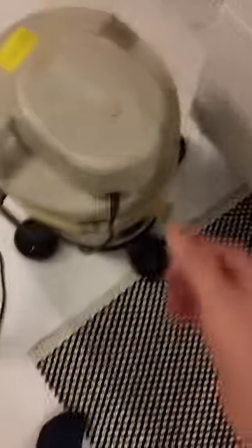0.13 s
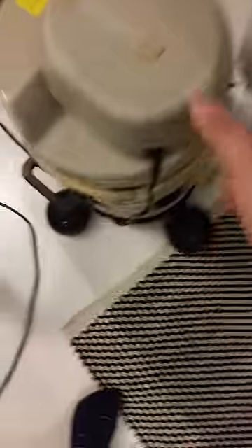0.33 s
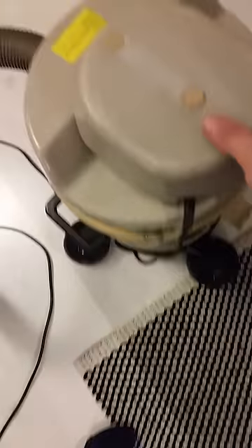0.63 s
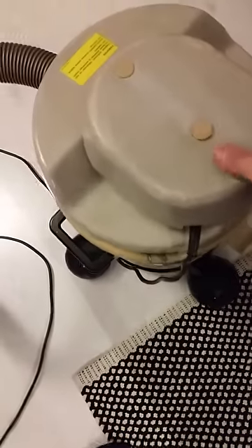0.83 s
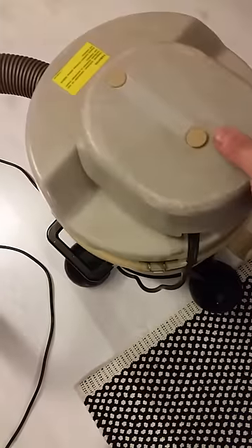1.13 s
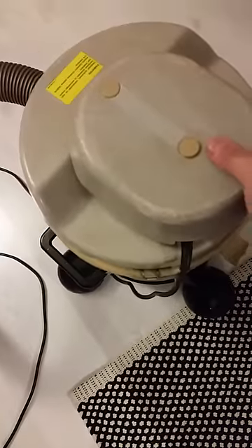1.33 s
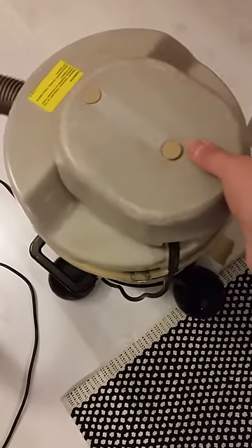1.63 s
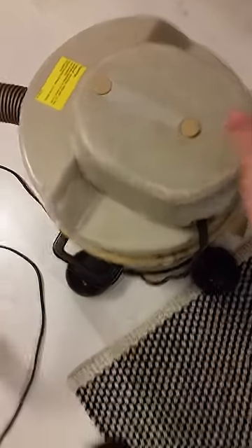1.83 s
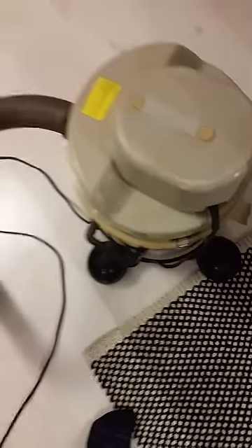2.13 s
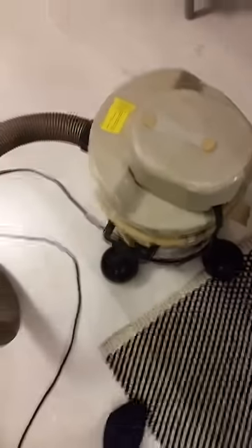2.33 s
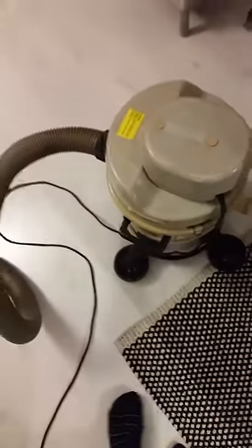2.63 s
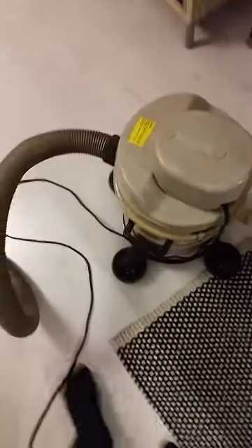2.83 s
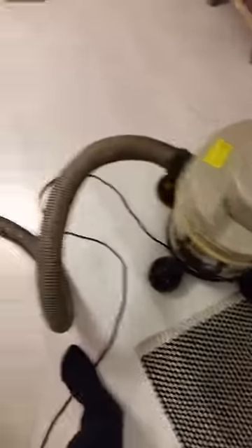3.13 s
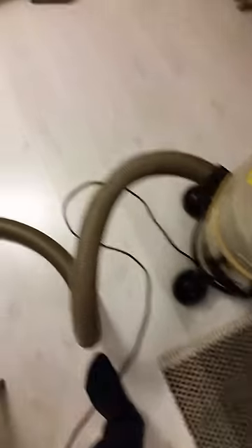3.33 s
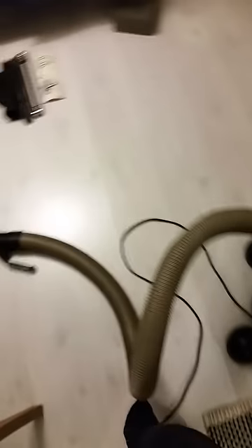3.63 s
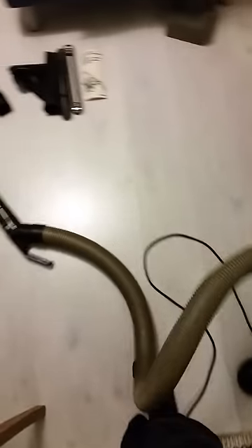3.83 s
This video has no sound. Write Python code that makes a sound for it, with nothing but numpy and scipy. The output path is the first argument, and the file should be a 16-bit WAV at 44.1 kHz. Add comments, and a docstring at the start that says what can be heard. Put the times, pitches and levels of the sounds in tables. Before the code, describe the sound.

A vacuum cleaner motor snaps on in a quiet room and spins up to a loud roar

```python
"""A wet and dry vacuum cleaner starts in a quiet room: filtered-noise room tone, a faint rustle, soft bumps.
At 1.7 s the switch snaps (decaying sines and noise); inrush makes the motor hum and its brushes fizz.
The shaft spins up to a steady tone with blade whine and overtones (sines locked to one shaft angle).
Air roars through the fan (noise that grows with speed) and booms in the drum (a wandering sine),
while the microphones back away towards the hose (level curves)."""
import sys
import numpy as np
from scipy import signal
from scipy.fft import rfft, irfft
from scipy.io import wavfile
from scipy.ndimage import uniform_filter1d

SR = 44100
rng = np.random.default_rng(int(sys.argv[2]) if len(sys.argv) > 2 else 0)


def inscribe(sig):
    """Save sig as 16-bit PCM at rate SR to the path in sys.argv[1].

    A 1-D sig is mono; a 2-D sig holds one channel per row.
    Samples are clipped to [-1, 1] before scaling.
    """
    pcm = np.round(np.clip(np.atleast_2d(sig).T, -1, 1) * 32767)
    wavfile.write(sys.argv[1], SR, pcm.astype(np.int16))


N = 176400
T = np.arange(N) / SR
HZ = np.fft.rfftfreq(N, 1 / SR)

# Spectra give relative density; each noise is scaled to rms 1 before its level.
# stereo balance: (frequency [Hz], left minus right [dB])
TILT = [(100, -2.5), (330, 0), (500, 4), (1000, 1.5), (1600, 2), (2400, -4), (3300, 0), (4000, 1),
        (5000, -9), (5600, -4), (6700, -1.5), (7700, 13), (9600, 24), (11500, 18), (13500, 13), (15500, 10)]
ROOM_TILT = [(40, -5), (120, -19), (200, -10), (300, -1), (550, 8), (1700, 6), (2700, -4), (3900, 12.5),
             (5500, 0), (10000, 2), (11500, 5), (15500, 5)]
# left-right likeness of noise: (frequency [Hz], correlation [-1..1])
LIKENESS = [(30, 0.21), (100, 1), (350, 0.63), (600, 0.69), (1000, 0.47), (1500, .05), (2200, 0.03),
            (4000, -0.15), (7000, -0.02), (16000, 0)]

# quiet room spectrum: (frequency [Hz], density [dB per Hz])
ROOM_SPECTRUM = [(25, -3.5), (55, -1), (100, -2.5), (150, -6.5), (250, -20.5), (450, -25.5), (580, -22.5),
                 (1000, -28.5), (1800, -34), (2300, -44), (2900, -54), (3300, -41), (3700, -27),
                 (4100, -28.5), (4600, -41), (6200, -61), (10300, -59), (11600, -51), (12700, -51),
                 (15500, -45)]
ROOM_DB = -53.5
# handling rustle spectrum: (frequency [Hz], density [dB per Hz])
RUSTLE_SPECTRUM = [(80, 5.5), (200, 5), (500, -2.5), (900, -8), (1400, -14), (1750, -4), (2200, -24),
                   (3000, -24), (3900, -8.5), (4800, -30), (15000, -47)]
# handling rustle level: (time [s], level [dB])
RUSTLE_LEVEL = [(0, -58.5), (.17, -58.5), (.42, -59.5), (.6, -71), (1.0, -90)]
# soft handling bumps: (centre time [s], peak level [dB], frequency [Hz], 1/e half-length [s])
BUMPS = [(.13, -52, 110, .015), (.185, -50, 130, .015), (.853, -66, 800, .01), (.91, -63, 430, .025),
         (1.485, -45, 100, .013)]

# switch snaps: (time [s], level [dB])
SNAPS = [(1.6918, -43), (1.6941, -28.5)]
# plastic lid modes: (frequency [Hz], level re snap [dB], t60 [s])
LID_MODES = [(384, -10, 0.22), (557, 2, .055), (800, -8, 0.036), (1170, -10, .05), (1600, -0.5, 0.027),
             (2130, -10, 0.047), (3660, -21, .03), (4500, -10.5, 0.016)]
# switch crack spectrum: (frequency [Hz], density [dB per Hz])
CRACK_SPECTRUM = [(300, 8), (2000, 6), (3000, -13), (5000, -3), (7000, -27), (9500, -20), (12000, -5),
                  (15500, -9)]
CRACK_RE_SNAP_DB, CRACK_T60_S = 3, 0.028

HUM_HZ, HUM_RISE_S = 100, 0.023
INRUSH_HUM_DB, STEADY_HUM_DB = -30, -49
INRUSH_HOLD_S, INRUSH_FADE_S = 0.15, 0.26
# brush fizz spectrum: (frequency [Hz], density [dB per Hz])
BRUSH_SPECTRUM = [(100, -2), (400, -1), (900, 0.5), (1300, -8), (2100, -9), (3000, -15), (5000, -25),
                  (7000, -34), (8500, -22), (11000, -25), (15000, -24)]
BRUSH_DB, BRUSH_PULSE_DEPTH = -38, 0.21
# brush sparks as the rotor breaks loose: (time [s], level before the hum rise [dB], 1/e half-length [s])
SPARKS = [(1.709, -37, .004), (1.732, -36.5, 0.0098)]

ON_S, TOP_HZ = 1.7, 333.5
QUICK_S, SLOW_S, SLOW_SHARE = 0.12, 0.28, 0.47
# shaft tone at the moving microphones: (time [s], left level [dB], right level [dB])
SHAFT_LEVEL = [(1.7, -60, -60), (1.77, -38, -44), (1.805, -24.5, -26), (1.86, -20.5, -24.5),
               (1.93, -33, -25), (2.035, -46, -32), (2.08, -25.5, -23), (2.19, -27, -21.5),
               (2.27, -25.5, -20.5), (2.35, -21.5, -18.5), (2.46, -18.5, -15.5), (2.575, -41, -25),
               (2.64, -24.5, -27.5), (2.75, -20.5, -21.5), (3.0, -18, -18), (3.5, -13.5, -12.5),
               (3.75, -15.5, -14), (4.0, -18, -15)]
SHAFT_LAG_RAD = 0.15  # mean lag between the microphones
WOBBLE_SHARE = 0.00046  # rms, of shaft speed
BLADES = 6
# blade whine: (time [s], level [dB])
WHINE_LEVEL = [(1.7, -70), (1.9, -32.5), (2.05, -42), (2.1, -33), (2.2, -35), (2.3, -36), (2.85, -46),
               (3.1, -33), (3.38, -36), (3.52, -25.5), (3.7, -33.5), (3.85, -27.5), (4.0, -28)]
# shaft overtones: (multiple of shaft speed, level at full speed [dB])
OVERTONES = [(2, -40.5), (3, -36.5), (4, -40), (5, -40), (7, -46), (11, -47), (12, -54), (24, -49),
             (26, -51), (29, -67), (32, -65)]
OVERTONE_FADE_DB = 3
# housing resonances swept by overtones:
# (multiple of shaft speed, centre [Hz], width [Hz], peak level [dB], phase smear [rad rms])
HOUSING_MODES = [(2, 375, 24, -28.5, .3), (2, 593, 58, -37.5, 0.6), (13, 1860, 720, -32, 0.59),
                 (13, 2900, 300, -38.5, 1.3), (24, 4600, 780, -46, 3.2), (36, 9000, 770, -43, 3.15),
                 (48, 10000, 1500, -41, 1.6), (36, 10260, 230, -26.5, .5), (35, 10290, 130, -26.5, .5),
                 (36, 10770, 120, -34, .7), (34, 11000, 100, -43, 0.59), (32, 10250, 130, -46, .7),
                 (31, 10230, 80, -44, 0.76)]
SMEAR_HZ, OVERTONE_SMEAR_RAD, WHINE_SMEAR_RAD = 70, 0.3, 0.15

# rushing air spectrum: (frequency [Hz], density [dB per Hz])
AIR_SPECTRUM = [(240, -17), (400, -2), (470, -5), (600, -9), (700, -13), (790, -9), (880, -5.5), (1050, -6),
                (1300, -6), (1470, -9), (1700, -4), (2000, -4), (2400, -7), (2850, -10), (3150, -10.5),
                (3950, -10.5), (4800, -11), (5500, -14), (7000, -20), (8100, -18.5), (9400, -13),
                (10200, -18), (11000, -19), (12200, -21.5), (13700, -27), (15700, -29)]
AIR_DB = -19.5
# air level at the moving microphones:
# (time [s], below the treble [dB], left treble [dB], right treble [dB])
AIR_LEVEL = [(1.7, -18, -1, -1), (1.8, -0.5, 0, -2), (1.92, 0, 2.5, 4.5), (2.1, 0, 0.5, 2.5),
             (2.3, -1, 0, 1.5), (2.65, .5, 0.5, 2), (3.0, 1, 0.5, 0.5), (3.4, -1, -.5, -1.5),
             (3.75, -.5, -1, -2.5), (4.0, -0.5, -3, -3.5)]
TREBLE_FROM_HZ, TREBLE_FULL_HZ = 1500, 4300
# growth of air noise with speed: (frequency [Hz], exponent of amplitude)
GROWTH = [(400, 0.52), (1000, 1.54), (2000, 0.84), (3200, 3.07), (5000, 2.04), (9000, 2.75), (15000, 1.2)]
# air path resonances: (centre [Hz], width [Hz], lift [dB])
DUCTS = [(790, 160, 5.5), (2770, 98, 5.5), (2914, 47, 5.5), (3960, 57, 5), (5510, 88, 4), (10240, 110, 6.5)]
RIPPLE_DB, PATCH_DB, FLUTTER_DB = 2.13, 1.25, 0.38
# low roar spectrum: (frequency [Hz], density [dB per Hz])
ROAR_SPECTRUM = [(25, -44), (60, -17.5), (120, -8), (165, -4.5), (250, 0.5), (300, 0), (380, 5),
                 (440, -5.5), (600, -8), (1200, -66)]
ROAR_DB, ROAR_POWER = -29, 0.99

# drum boom: (time [s], level [dB])
BOOM_LEVEL = [(1.75, -60), (1.9, -33.5), (2.22, -34), (2.45, -44), (2.61, -24.5), (2.68, -36),
              (2.81, -28.5), (2.91, -44), (3.02, -25.5), (3.26, -36), (3.38, -27), (3.47, -42.5),
              (3.62, -30), (3.9, -34), (4.0, -42)]
BOOM_TOP_HZ, BOOM_WANDER_HZ, BOOM_POWER = 187.4, 7.4, 0.55

EDGE_HZ = 15850


def amp(db):
    """Decibels to gain."""
    return 10 ** (np.asarray(db) / 20)


def unit(x):
    """Scales to rms 1."""
    return x / np.sqrt(np.mean(x ** 2) + 1e-20)


def curve(points, t=T, axis=1):
    """Reads one column of a table over time."""
    columns = np.transpose(points)
    return np.interp(t, columns[0], columns[axis])


def read(points, hz):
    """Reads a table over log frequency."""
    f, value = np.transpose(points)
    return np.interp(np.log(hz + 1), np.log(f + 1), value)


def drift(rate_hz):
    """Random motion of rms 1: noise low-passed at rate_hz."""
    t = T[::50]
    z = rfft(rng.standard_normal(len(t)))
    z = z / (1 + (HZ[:len(z)] / rate_hz) ** 4)
    return np.interp(T, t, unit(irfft(z, len(t))))


def sides(hz, tilt=TILT):
    """Left and right gains at constant summed power."""
    ratio = amp(read(tilt, hz))
    return np.array([ratio, np.ones_like(ratio)]) * np.sqrt(2 / (1 + ratio ** 2))


def noise(spectrum):
    """Coloured stereo noise of rms 1, its channels correlated by frequency."""
    a, b = rfft(rng.standard_normal((2, N)))
    same = np.clip(read(LIKENESS, HZ), -1, 1)
    pair = np.array([a, same * a + np.sqrt(1 - same ** 2) * b])
    return unit(irfft(pair * amp(read(spectrum, HZ)), N))


def ported(x, tilt=TILT):
    """Applies the colour of each microphone."""
    return irfft(rfft(x) * sides(HZ, tilt), N)


def speed(t):
    """Shaft speed as a share of full speed: a quick run-up plus a slow settling."""
    age = np.maximum(t - ON_S, 0)
    quick = (1 - SLOW_SHARE) * (1 - np.exp(-age / QUICK_S))
    return quick + SLOW_SHARE * (1 - np.exp(-age / SLOW_S))


def room():
    """Room tone, a faint rustle and soft band-noise bumps as the hand reaches for the switch."""
    out = amp(ROOM_DB) * noise(ROOM_SPECTRUM) + amp(curve(RUSTLE_LEVEL)) * noise(RUSTLE_SPECTRUM)
    for centre_s, db, hz, length_s in BUMPS:
        shape = np.exp(-((T - centre_s) / length_s) ** 2)
        thud = noise([(hz / 4, -15), (hz, 0), (hz * 1.46, -6), (hz * 4, -45), (hz * 16, -80)])
        out += amp(db) * shape * thud
    return ported(out, ROOM_TILT)


def switch():
    """The switch gives way and snaps home: each snap cracks and rings the plastic lid's modes."""
    out = np.zeros((2, N))
    for start_s, snap_db in SNAPS:
        age = np.maximum(T - start_s, 0)
        ring = sum(amp(db - 60 * age / t60) * np.sin(2 * np.pi * hz * age) for hz, db, t60 in LID_MODES)
        crack = amp(CRACK_RE_SNAP_DB - 60 * age / CRACK_T60_S) * ported(noise(CRACK_SPECTRUM))
        out += amp(snap_db) * (ring + crack) * (T > start_s)
    return out


def current():
    """Electrical hum and brush fizz pulsing with it, strongest during the inrush."""
    age = np.maximum(T - SNAPS[-1][0], 0)
    inrush = np.exp(-np.maximum(age - INRUSH_HOLD_S, 0) / INRUSH_FADE_S)
    wave = np.sin(2 * np.pi * HUM_HZ * age)
    hum = np.sqrt(2) * np.maximum(amp(INRUSH_HUM_DB) * inrush, amp(STEADY_HUM_DB)) * wave
    sparks = sum(amp(db) * np.exp(-((T - t_s) / length_s) ** 2) for t_s, db, length_s in SPARKS)
    brushing = amp(BRUSH_DB) * inrush * (1 + BRUSH_PULSE_DEPTH * wave)
    fizz = (brushing + sparks) * ported(noise(BRUSH_SPECTRUM))
    return (hum + fizz) * np.minimum(age / HUM_RISE_S, 1)


def motor():
    """Shaft tone, blade whine, fading overtones, and housing modes that swell as overtones pass."""
    pace = speed(T)
    hz = TOP_HZ * pace * (1 + WOBBLE_SHARE * drift(9.6))
    angle = 2 * np.pi * np.cumsum(hz) / SR

    def tone(k, smear=0):
        """Stereo sine at k times the shaft speed; the right channel lags or leads in phase."""
        if k == 1:
            shift = SHAFT_LAG_RAD * (1 + 0.5 * drift(1.4))
        else:
            spread = np.pi * (1 - read(LIKENESS, k * TOP_HZ)) / 2
            shift = (2 * rng.random() - 1) * spread
        phase = np.array([k * angle, k * angle + shift]) + smear
        return np.sqrt(2) * sides(k * hz) * np.sin(phase)

    shaft = amp([curve(SHAFT_LEVEL), curve(SHAFT_LEVEL, axis=2)]) * tone(1)
    whine = amp(curve(WHINE_LEVEL)) * tone(BLADES, WHINE_SMEAR_RAD * drift(SMEAR_HZ))
    out = shaft + whine
    for k, db in OVERTONES:
        wander = np.array([drift(1.9), drift(5.4)]) + drift(4.5)  # per side + common
        fade = amp(OVERTONE_FADE_DB * wander / np.sqrt(2))
        out += amp(db) * pace * unit(fade) * tone(k, OVERTONE_SMEAR_RAD * drift(SMEAR_HZ))
    for k, centre_hz, width_hz, db, smear_rad in HOUSING_MODES:
        swell = 1 / (1 + (2 * (k * hz - centre_hz) / width_hz) ** 2)
        flicker = 1 + 0.31 * drift(SMEAR_HZ)
        out += amp(db) * swell * flicker * tone(k, smear_rad * drift(SMEAR_HZ))
    return out * (T > ON_S)


def air():
    """Turbulence grows with speed; ducts lift narrow bands, random patches act as room-echo ripple."""
    hz, t, z = signal.stft(ported(noise(AIR_SPECTRUM)), SR, nperseg=1024, noverlap=768)

    def patches(bins, frames):
        """Random gain map of rms 1, smoothed over frequency and time."""
        grain = uniform_filter1d(rng.standard_normal(z.shape), bins, 1)
        return unit(uniform_filter1d(grain, frames, 2))

    db = RIPPLE_DB * patches(2, 90) + PATCH_DB * patches(6, 7)
    db += FLUTTER_DB * rng.standard_normal(len(t))
    db += sum(lift / (1 + (2 * (hz - f) / width) ** 2) for f, width, lift in DUCTS)[:, None]
    high = np.interp(hz, [TREBLE_FROM_HZ, TREBLE_FULL_HZ], [0, 1])[:, None]
    treble = np.array([curve(AIR_LEVEL, t, axis=2), curve(AIR_LEVEL, t, axis=3)])[:, None]
    db += (1 - high) * curve(AIR_LEVEL, t) + high * treble
    z = z * amp(db) * speed(t) ** read(GROWTH, hz)[:, None]
    rush = amp(AIR_DB) * signal.istft(z, SR, nperseg=1024, noverlap=768)[1][:, :N]
    roar = amp(ROAR_DB) * noise(ROAR_SPECTRUM) * speed(T) ** ROAR_POWER
    return (rush + roar) * (T > ON_S)


def drum():
    """The air flow booms unsteadily in the drum, its pitch rising with shaft speed."""
    hz = BOOM_TOP_HZ * speed(T) ** BOOM_POWER + BOOM_WANDER_HZ * drift(26.4)
    angle = 2 * np.pi * np.cumsum(hz) / SR
    unsteady = unit(1 + 0.19 * drift(15))
    return np.sqrt(2) * amp(curve(BOOM_LEVEL)) * unsteady * np.sin(angle) * (T > ON_S)


def scene():
    """The vacuum cleaner in its room."""
    return room() + switch() + current() + motor() + air() + drum()


def record(dry):
    """Band limit: linear-phase low-pass at EDGE_HZ."""
    lowpass = signal.firwin(511, EDGE_HZ, window=("kaiser", 9), fs=SR)
    return signal.oaconvolve(dry, lowpass[None], "same")


dry = scene()
out = record(dry)
inscribe(out)
```